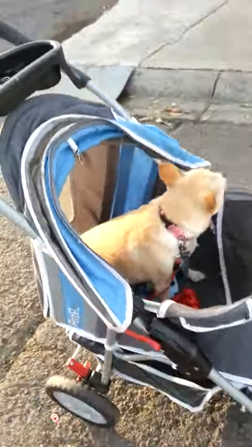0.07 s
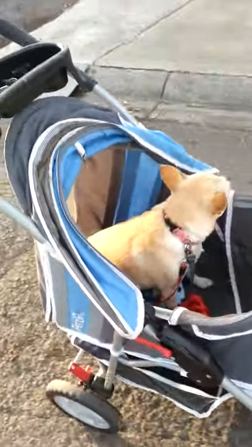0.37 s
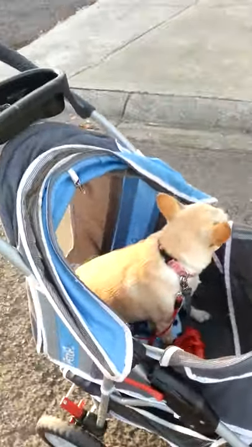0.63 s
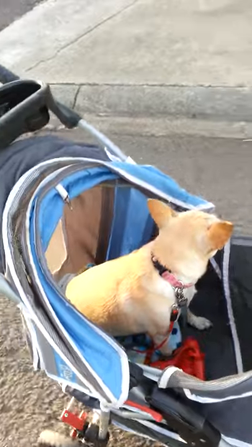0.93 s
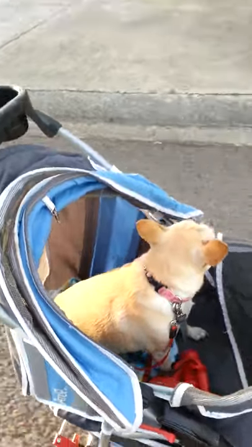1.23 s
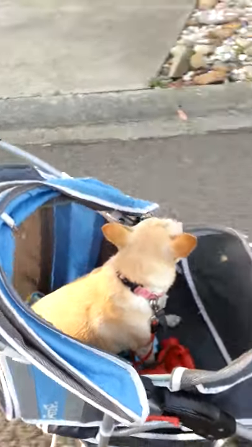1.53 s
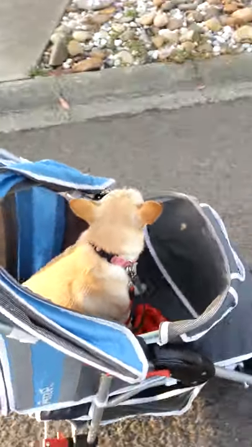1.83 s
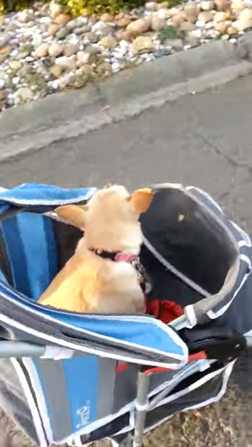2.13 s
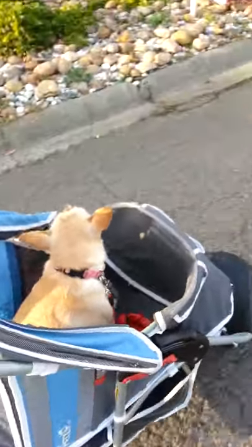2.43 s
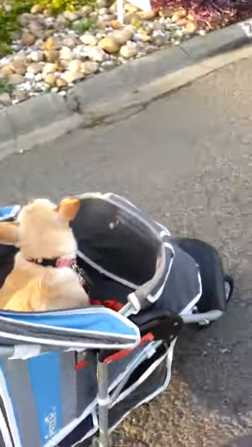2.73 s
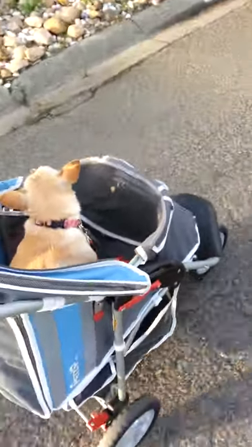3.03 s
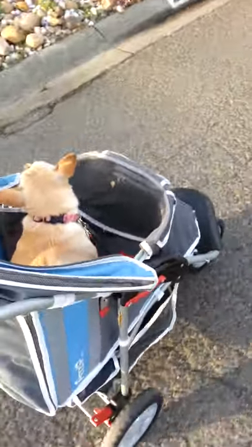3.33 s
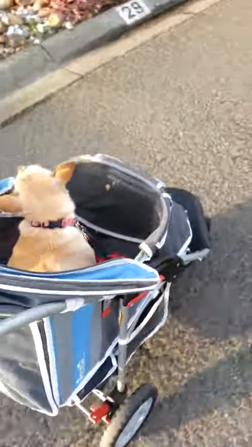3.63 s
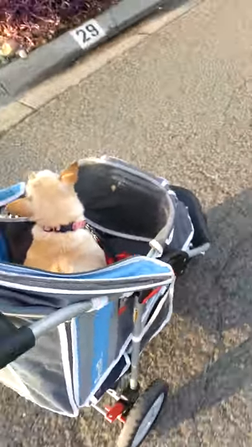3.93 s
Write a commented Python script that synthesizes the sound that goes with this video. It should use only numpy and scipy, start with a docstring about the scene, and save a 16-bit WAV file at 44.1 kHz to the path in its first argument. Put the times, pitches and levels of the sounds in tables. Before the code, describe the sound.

A pet stroller rolls over gritty asphalt, rattling, as wind buffets the microphone.

```python
"""Grit crunches under the wheels of a pet stroller rolling over coarse asphalt in the open air.
The road shakes the frame: small metal fittings clink and loose plastic joints knock.
A narrow hiss swells twice. Wind puffs at the two microphone ports with soft thuds,
then gusts hard enough to spit and overload the recorder."""
import sys
import numpy as np
from scipy import signal
from scipy.fft import rfft, irfft, next_fast_len
from scipy.io import wavfile
from scipy.ndimage import uniform_filter1d, map_coordinates

SR = 44100
rng = np.random.default_rng(int(sys.argv[2]) if len(sys.argv) > 2 else 0)


def master_out(mix):
    """Clip the mix to full scale and print it as 16-bit PCM to the path in sys.argv[1]."""
    frames = np.transpose(np.atleast_2d(mix))
    ceiling = np.clip(frames, -1, 1)
    pcm = np.round(ceiling * 32767).astype(np.int16)
    wavfile.write(sys.argv[1], SR, pcm)


N = 176400
T = np.arange(N) / SR

# tone of cracking grit (frequency [Hz], level [dB])
GRIT_EQ = [(300, -4), (800, 2), (2300, -6.5), (3400, -8), (4800, -11), (5800, -20), (14000, -27)]
# how hard the road shakes the wheels (time [s], level [dB])
ROLL_LEVEL = [(0, -57), (.19, -46.5), (.36, -52.5), (.445, -49), (.46, -30), (.55, -45.5), (.75, -45),
              (.98, -47.5), (1.06, -38), (1.17, -61), (1.23, -36), (1.31, -38.5), (1.38, -47),
              (1.47, -38.5), (1.66, -50), (1.72, -45.5), (1.95, -43), (1.975, -36), (2.25, -35.5),
              (2.65, -38.5), (2.82, -37.5), (2.92, -42.5), (3.3, -40.5), (4, -38.5)]
# resonances of the frame (frequency [Hz], level [dB])
FRAME_EQ = [(60, 3.5), (200, -24), (500, -5), (720, 8), (900, -1), (1200, 6.5), (1800, -7), (2250, 0.5),
            (3400, -11), (5100, -14.5), (6000, -29), (9000, -23.5), (15000, -69)]
# stereo image of frame and air (frequency [Hz], left-right correlation [-1..1])
STEREO_IMAGE = [(100, 0.39), (400, 0.89), (1000, 0.54), (2400, -0.14), (6000, -0.057)]
# swell of the sandy rasp under the tyres (time [s], level [dB])
SAND_LEVEL = [(0, -58), (.44, -55.5), (.47, -57), (.62, -48.5), (.72, -60.5), (.98, -60.5), (1.06, -44.5),
              (1.17, -63), (1.5, -55.5), (1.955, -61), (1.975, -36.5), (2.06, -61), (2.28, -53.5),
              (2.7, -58), (3.05, -57), (3.4, -52.5), (4, -63)]
# tone of that rasp (frequency [Hz], level [dB])
SAND_EQ = [(300, -20), (900, 9), (1600, -1), (2600, 9.5), (4500, 4), (6500, 0), (10000, -5.5), (14500, -13)]
# outdoor air bed (frequency [Hz], level [dB])
AIR_EQ = [(30, -54), (90, -0.5), (220, 3), (500, -7), (1000, -5), (2000, -18), (4500, -21), (6500, -29.5),
          (10000, -29), (14500, -36)]
# hits of the metal fittings (time [s], level [dB], main ring [Hz])
CLINKS = [(0.0743, -23.5, 5230), (0.171, -21.5, 5900), (0.2947, -17, 6370), (0.786, -26, 5200),
          (0.9183, -19.5, 5150), (1.118, -22.5, 4770), (1.8508, -20, 8500), (2.52, -4.5, 8130),
          (2.595, -8, 7470), (2.99, -14, 6300), (3.681, -18, 10800), (3.699, -1.5, 6490),
          (3.9523, -16.5, 7800)]
# modes that all fittings share (frequency [Hz], level [dB], decay by 60 dB [s])
METAL_MODES = [(4270, -3, 0.013), (7800, -18, 0.036), (8900, -20, 0.021)]
# bright attack of a clink (frequency [Hz], level [dB])
TICK_EQ = [(1500, -14), (3200, 1), (4300, -6), (5600, -2.5), (7700, -5), (10000, -4.5), (14500, -12.5)]
# hits of the plastic joints (time [s], level [dB], ring [Hz])
KNOCKS = [(0.161, -29.5, 800), (0.2, -27.5, 950), (0.2738, -30.5, 1910), (0.4536, -22.5, 2020),
          (0.708, -24.5, 2144), (0.788, -29, 2630), (0.9187, -28.5, 1350), (1.051, -25.5, 1650),
          (1.117, -26.5, 1430), (1.2176, -24.5, 1480), (1.3113, -28.5, 2226), (1.465, -25, 2300),
          (1.5586, -35, 2240), (1.582, -25.5, 2900), (1.697, -22, 1370), (1.747, -22.5, 1520),
          (1.8427, -26.5, 2390), (1.911, -25, 1060), (1.969, -21.5, 2280), (2.0429, -15, 1380),
          (2.177, -24.5, 1390), (2.242, -16.5, 2160), (2.833, -30, 2200), (2.848, -23.5, 1440),
          (2.994, -18.5, 1430), (3.452, -22, 1530), (3.8191, -15.5, 1470), (3.881, -28, 790),
          (3.964, -21.5, 1240), (3.9944, -17.5, 2550)]
# dull attack of a knock (frequency [Hz], level [dB])
JOINT_EQ = [(300, 6), (900, 1.5), (1400, 8), (2300, -1.5), (3400, -6), (4800, -5), (6000, -21),
            (14000, -37)]
# swells of the hiss (time [s], level [dB])
HISS_LEVEL = [(0, -68), (.35, -55), (.55, -45), (.7, -50), (.85, -59), (1.5, -62), (1.85, -58), (2.7, -62),
              (2.92, -47.5), (3.1, -57), (4, -62)]
# its narrow band (frequency [Hz], level [dB])
HISS_EQ = [(2500, -42), (3900, -11), (4400, -1.5), (4850, -14), (5700, -50)]
# wind pressure on the left port (time [s], level [dB])
GUST_LEFT = [(0, -81), (1.3, -38), (1.65, -50), (2.105, -44), (2.139, -15.5), (2.163, -40), (2.205, -22),
             (2.235, -14), (2.359, -24.5), (2.465, -10.5), (2.525, -15.5), (2.578, -45), (2.605, -18.5),
             (2.666, -21), (2.77, -34), (2.89, -30), (2.965, -44), (3.017, 0.5), (3.048, -10.5),
             (3.072, -33), (3.084, -9), (3.197, -12.5), (3.25, -23), (3.275, -17), (3.365, -12),
             (3.4, -23.5), (3.47, -15.5), (3.552, -9.5), (3.608, -13.5), (3.708, -8.5), (3.732, -19),
             (3.771, -14.5), (3.83, -27), (3.859, -21), (3.975, -40), (3.999, -18)]
# wind pressure on the right port (time [s], level [dB])
GUST_RIGHT = [(0, -63), (1.3, -33.5), (1.65, -47.5), (2.02, -41.5), (2.115, -24.5), (2.25, -27.5),
              (2.343, -19.5), (2.435, -29), (2.492, -4), (2.55, -31.5), (2.6, -18.5), (2.698, -30.5),
              (2.941, -28), (3.01, -13), (3.065, -42), (3.08, -16), (3.233, -18), (3.316, -22),
              (3.37, -14.5), (3.452, -21), (3.472, -14.5), (3.524, -10), (3.544, -27), (3.57, -16.5),
              (3.636, -24), (3.716, -15.5), (3.736, -28.5), (3.81, -36), (3.85, -19), (3.999, -34)]
# single eddies hitting the ports (time [s], level [dB], half length [s], left minus right [dB])
EDDIES = [(0.38, -26, 0.0067, 30), (0.53, -17.5, 0.0085, -9), (0.567, -13.5, 0.011, -26),
          (0.869, -19, 0.0024, -30), (1.046, -16.5, 0.012, -16), (1.083, -7, 0.0026, -4.5),
          (1.098, -21.5, 0.0062, -2), (1.172, -16.5, 0.0033, -29), (1.27, -14.5, 0.0012, -12),
          (1.355, -18, 0.0016, -11), (1.75, -18, 0.0043, -21), (1.789, -24, 0.011, -17),
          (2.067, -14.5, 0.0021, -25), (2.113, -11, .003, -15), (2.173, -13.5, 0.0015, -19),
          (2.229, -10.5, 0.002, 17), (2.287, -8, 0.006, 25), (2.423, -7, 0.0013, 13),
          (2.461, -4.5, 0.0019, 19), (2.506, -1, 0.0026, -19), (2.522, -7, 0.0022, 8),
          (2.713, -9, 0.0026, 24), (2.857, -13, 0.0029, -28), (2.984, -4.5, 0.0021, -10.5),
          (3.023, 2, 0.0035, 17), (3.044, 1, 0.0013, 25), (3.113, 3.5, 0.0028, 24),
          (3.256, -5.5, 0.0069, -14), (3.293, -10, 0.0034, -10), (3.346, 0.5, 0.0015, -11.5),
          (3.509, 0, 0.0024, 1), (3.525, 5, 0.0014, 8), (3.552, 4.5, 0.0016, 18), (3.564, 1, 0.0043, 26),
          (3.625, 0.5, 0.0015, 15), (3.639, -0.5, 0.005, 19), (3.667, 2, 0.0024, 24),
          (3.703, 6.5, 0.0027, 29)]
# low body of the wind (frequency [Hz], level [dB])
BUFFET_EQ = [(25, -57), (60, -33), (120, -9), (220, -1.5), (400, -4), (550, -8), (800, -18.5), (1200, -39),
             (2000, -64), (5000, -85)]
# finer turbulence of hard gusts (frequency [Hz], level [dB])
WHIRL_EQ = [(150, -25), (350, 3), (600, 0), (950, -6), (1500, -17), (2500, -50), (6000, -88)]
# spit of a port under the hardest pushes (frequency [Hz], level [dB])
CRACKLE_EQ = [(1000, 10), (3500, -1), (14000, -26)]

CONTACT_RISE_S = 0.00013


def amp(db):
    """Gain of a level in dB."""
    return 10 ** (np.asarray(db) / 20)


def unit(x):
    """Scale to rms 1."""
    return x / np.sqrt(np.mean(x ** 2) + 1e-20)


def even(x, seconds):
    """Ride the gain to hold rms near 1 over stretches of this length."""
    power = uniform_filter1d(x ** 2, int(seconds * SR), axis=-1)
    return x / np.sqrt(np.abs(power) + 1e-9)


def along(points, hz):
    """Read (Hz, value) points on a log frequency axis."""
    freqs, values = np.transpose(points)
    return np.interp(np.log(hz + 1), np.log(freqs + 1), values)


def curve(rows):
    """An envelope through (s, value) points."""
    return np.interp(T, *np.transpose(rows))


def wobble(rate):
    """A smooth random curve, rate knots a second."""
    return map_coordinates(rng.standard_normal(4096), [T * rate], mode="wrap")


def filtered(x, response):
    """Filter x by a gain that depends on frequency."""
    size = next_fast_len(N + SR // 2)
    return irfft(rfft(x, size) * response(np.fft.rfftfreq(size, 1 / SR)), size)[..., :N]


def coloured(x, eq):
    """Run x through a (Hz, dB) curve."""
    return filtered(x, lambda hz: amp(along(eq, hz)))


def noise(eq, image=((100, 0),)):
    """Coloured stereo noise of rms 1; image sets the left-right correlation."""
    def mid_side_gains(hz):
        angle = np.arccos(along(image, hz)) / 2
        return amp(along(eq, hz)) * [np.cos(angle), np.sin(angle)]
    mid, side = filtered(rng.standard_normal((2, N)), mid_side_gains)
    return unit(np.array([mid + side, mid - side]))


def pan(db):
    """Gains for left minus right in dB; the nearer side keeps full level."""
    return amp(np.minimum([[db], [-db]], 0))


def fade(t, t60):
    """A decay of 60 dB in t60 seconds."""
    return np.exp(-np.log(1000) * t / t60)


def burst(t, t60):
    """Decaying stereo white noise."""
    return rng.standard_normal((2, len(t))) * fade(t, t60)


def attack(t):
    """The quick rise of a contact."""
    return 1 - np.exp(-t / CONTACT_RISE_S)


def ring(t, hz, t60):
    """A damped mode, with its own phase at each port."""
    return np.sin(2 * np.pi * (hz * t + rng.random((2, 1)))) * fade(t, t60) * attack(t)


def add(out, start, sound):
    """Mix a sound in at start seconds."""
    part = out[:, round(start * SR):][:, :sound.shape[1]]
    part += sound[:, :part.shape[1]]


def grit(stones_per_s=170, centre_hz=2320, spread_octaves=0.804, t60=0.014):
    """Stones crack drily under the tyres at random, each with its own pitch."""
    stones, t = np.zeros((2, N)), T[:SR // 40]
    for start in rng.uniform(0, N / SR, stones_per_s * N // SR):
        hz = centre_hz * 2 ** (spread_octaves * rng.standard_normal())
        crack = attack(t) * burst(t, t60)
        add(stones, start, crack + amp(-1.5) * ring(t, hz, t60))
    return even(coloured(stones, GRIT_EQ), seconds=0.11)


def wheels():
    """The road rattles the frame unevenly; grit crunches and sand rasps on top."""
    rattle = even(amp(8.3 * wobble(rate=91)) * noise(FRAME_EQ, STEREO_IMAGE), seconds=0.098)
    rasp = unit(amp(3.5 * wobble(rate=450)) * noise(SAND_EQ))
    roll = amp(curve(ROLL_LEVEL)) * (amp(-1) * grit() + amp(0.5) * rattle)
    return roll + amp(curve(SAND_LEVEL) + 4) * rasp * pan(db=0.5)


def air():
    """A quiet, steady bed of outdoor air."""
    return amp(-41.5) * noise(AIR_EQ, STEREO_IMAGE)


def clinks():
    """Small metal fittings touch on the left: a bright tick and a few short modes."""
    ticks, rings, t = np.zeros((2, N)), np.zeros((2, N)), T[:SR // 12]
    for start, db, main_hz in CLINKS:
        modes = sum(amp(level) * ring(t, hz, t60) for hz, level, t60 in METAL_MODES)
        add(rings, start, amp(db) * (modes + ring(t, main_hz, t60=0.0063)))
        add(ticks, start, amp(db) * burst(t, t60=0.013))
    return pan(db=12) * (amp(-8) * rings + amp(-5.5) * coloured(ticks, TICK_EQ))


def knocks():
    """Loose plastic joints hit: a short dull burst and the joint's own ring."""
    bursts, rings, t = np.zeros((2, N)), np.zeros((2, N)), T[:SR // 12]
    for start, db, hz in KNOCKS:
        add(bursts, start, amp(db) * burst(t, t60=0.017))
        add(rings, start, amp(db) * ring(t, hz, t60=0.019))
    return amp(5.5) * coloured(bursts, JOINT_EQ) + amp(0.5) * rings


def hiss():
    """A narrow hiss near 4.4 kHz swells twice, with a slight flutter."""
    return amp(curve(HISS_LEVEL) + 1.7 * wobble(rate=30.8)) * noise(HISS_EQ) * pan(db=2.5)


def eddy(t, half_s, skew=0.33):
    """One eddy's push on a port: a bell curve that rises faster than it falls."""
    width = half_s * (1 + skew * np.sign(t))
    return np.exp(-(t / width) ** 2 / 2)


def wind_pressure(flutter_db=4.5, flutter_per_s=150, ceiling_db=6.5):
    """Fluttering gusts press on each port, with single eddies on top."""
    gusts = amp(np.array([curve(GUST_LEFT), curve(GUST_RIGHT)]) + 2.5)
    swing = np.array([wobble(flutter_per_s), wobble(flutter_per_s)])
    flutter = even(amp(flutter_db * swing), seconds=0.053)
    eddies = sum(amp(db) * pan(side) * eddy(T - time, half_s) for time, db, half_s, side in EDDIES)
    return np.minimum(np.hypot(gusts * flutter, eddies), amp(ceiling_db))


def wind(thud_hz=275, thud_octaves=0.81, half_open_db=-22):
    """Wind buffets the ports: gentle puffs thud in a narrow band, hard ones open up, whirl and spit."""
    pressure = wind_pressure()
    drive = np.minimum(pressure, 1)
    whirl = amp(-4) * drive ** 0.75 * noise(WHIRL_EQ)
    crackle = amp(-31) * drive ** 2.63 * noise(CRACKLE_EQ)
    buffet = even(noise(BUFFET_EQ), seconds=0.0161)
    thud_band = lambda hz: np.exp(-(np.log2((hz + 1) / thud_hz) / thud_octaves) ** 2 / 2)
    thud = unit(filtered(buffet, thud_band))
    opened = pressure / (pressure + amp(half_open_db))  # crossfade from thud to full buffet
    return pressure * (opened * buffet + (1 - opened) * thud + whirl) + crackle


def street_scatter(x):
    """Road and kerb throw back a very short reverb tail."""
    tail = burst(T[:SR // 3], t60=0.05)
    return signal.fftconvolve(x, tail / np.linalg.norm(tail[0]), axes=1)[:, :N]


def scene():
    """The stroller and its reflections, mixed with air, hiss and the wind at the ports."""
    stroller = wheels() + clinks() + knocks()
    return stroller + amp(-10) * street_scatter(stroller) + air() + hiss() + wind()


def record(dry, low_cut_hz=77, clip_level=0.96, top_hz=14900):
    """The recorder thins the deep bass, clips just under full scale and cuts off the top treble."""
    low_cut = signal.butter(3, low_cut_hz, "highpass", fs=SR, output="sos")
    clipped = np.clip(signal.sosfilt(low_cut, dry), -clip_level, clip_level)
    return filtered(clipped, lambda hz: hz < top_hz)


dry = scene()
out = record(dry)
master_out(out)
```